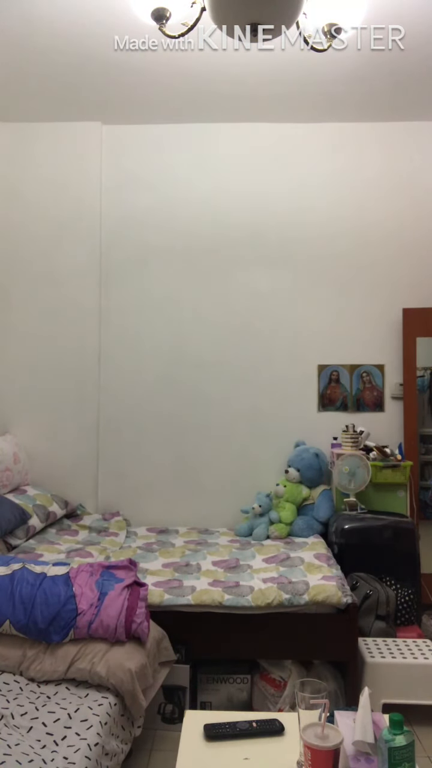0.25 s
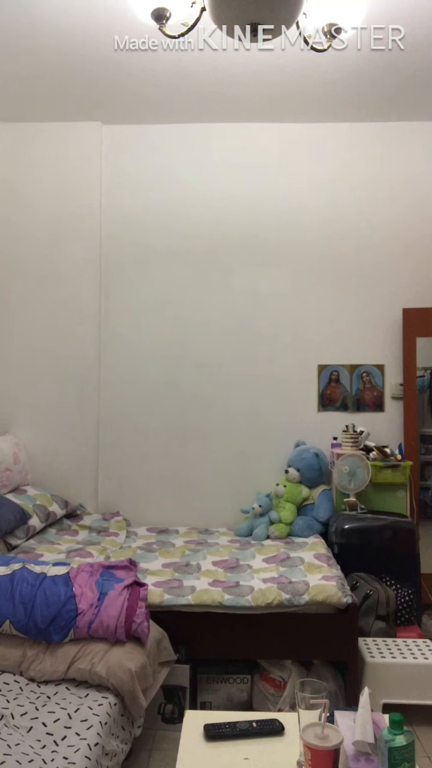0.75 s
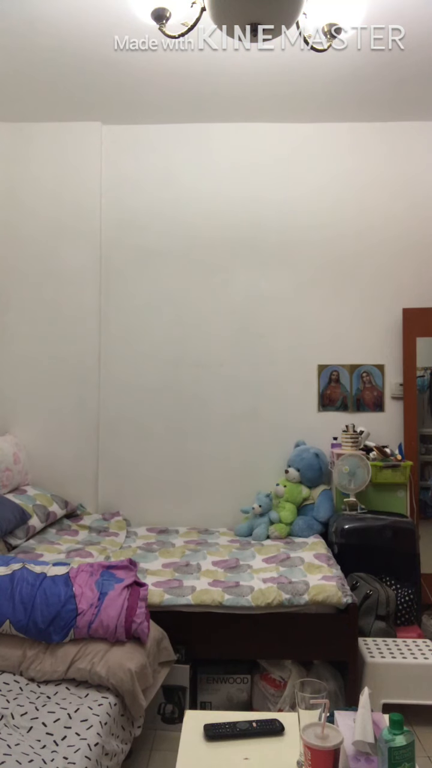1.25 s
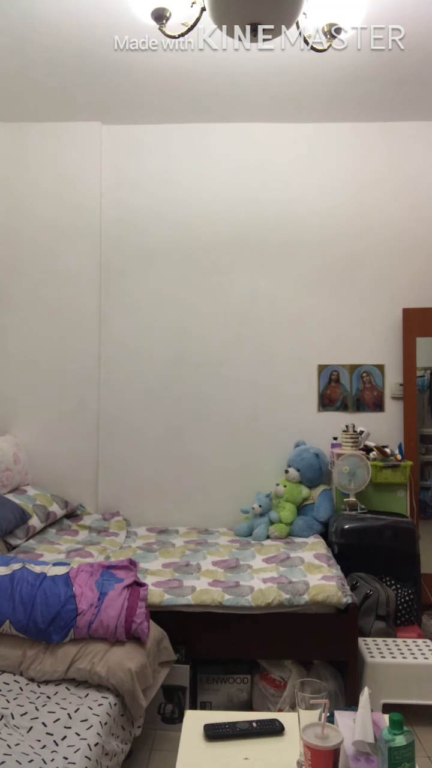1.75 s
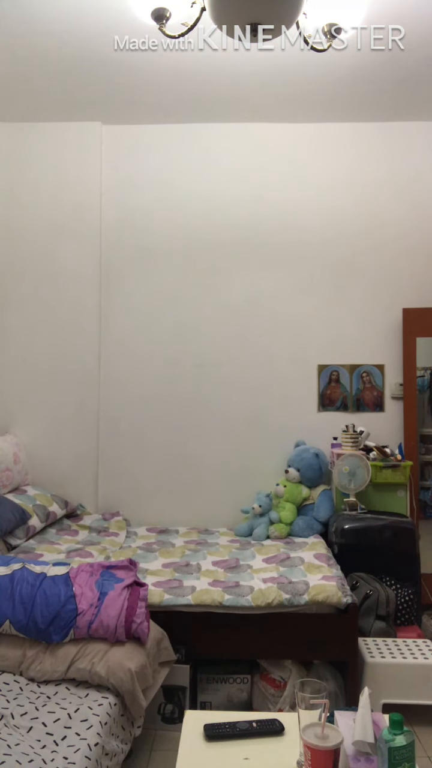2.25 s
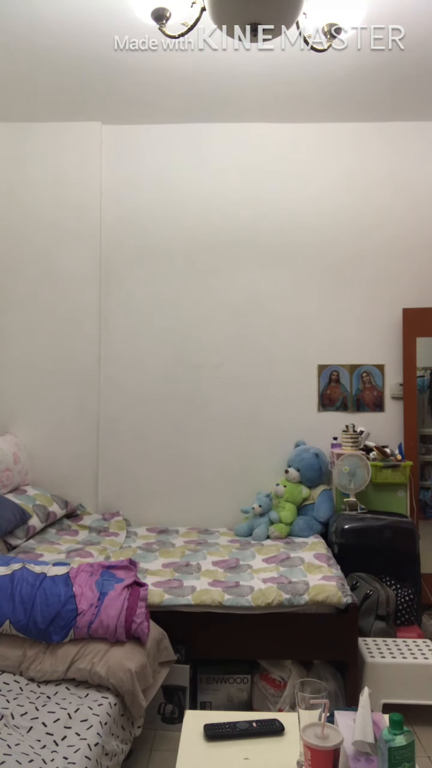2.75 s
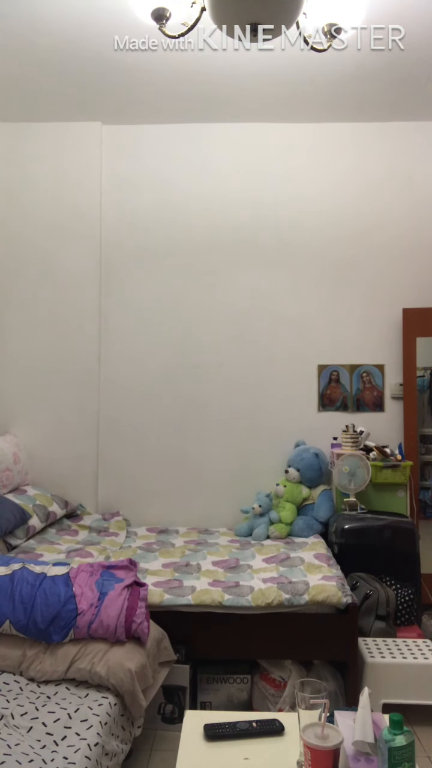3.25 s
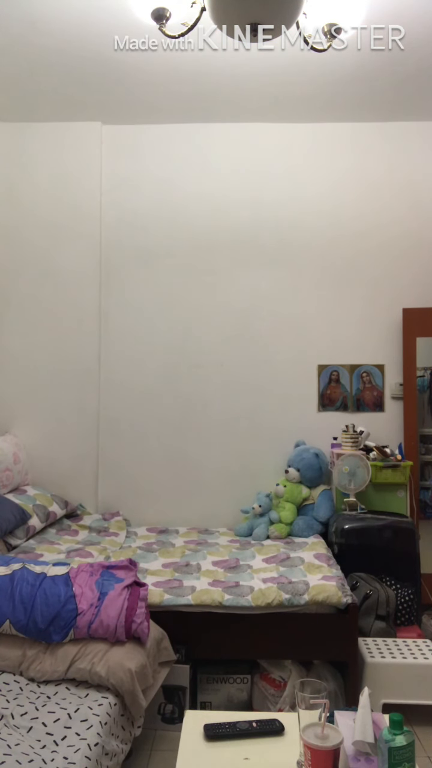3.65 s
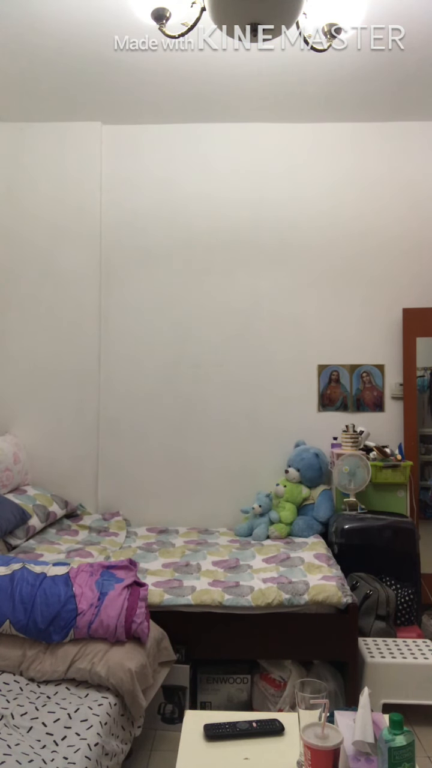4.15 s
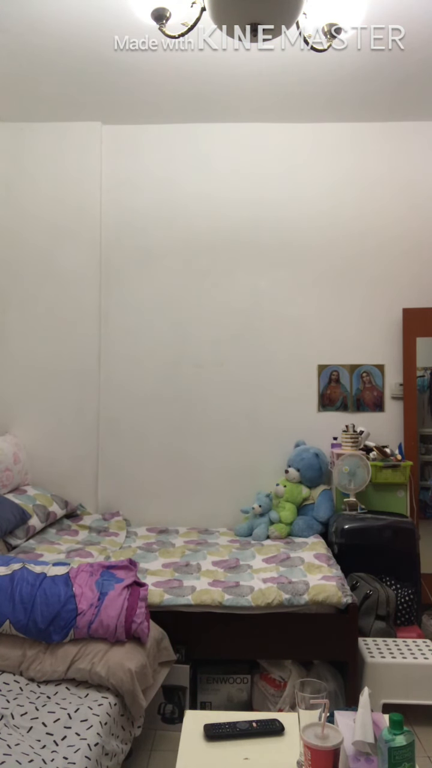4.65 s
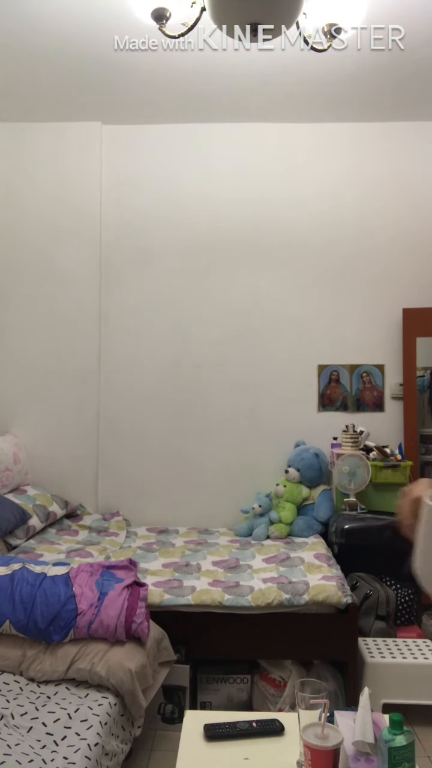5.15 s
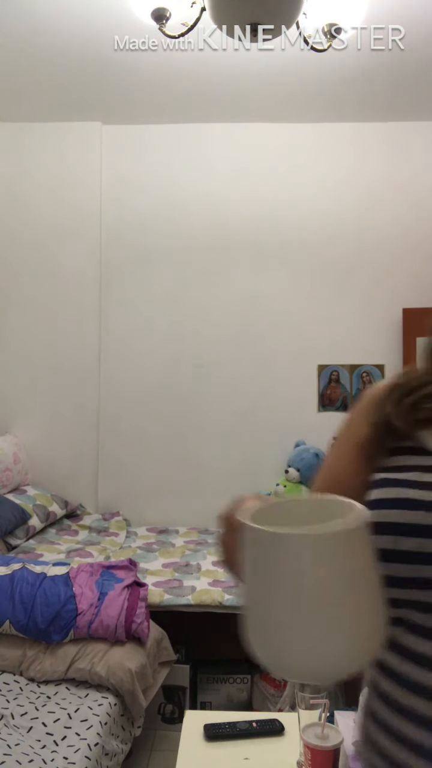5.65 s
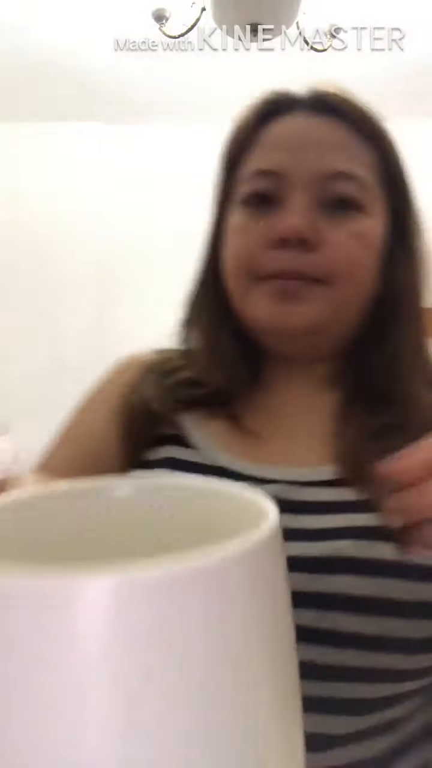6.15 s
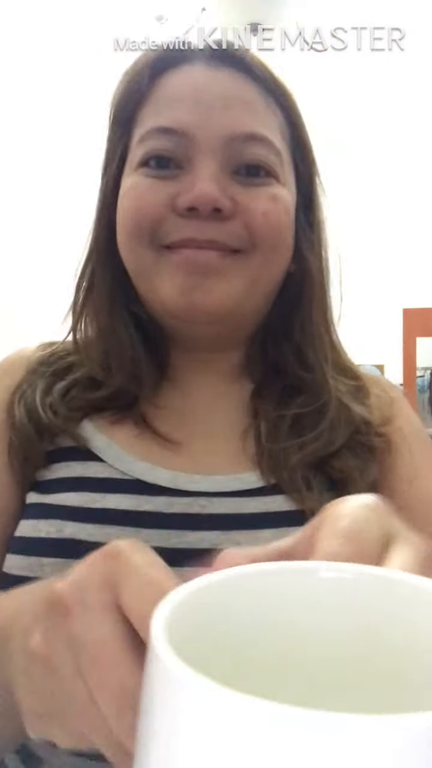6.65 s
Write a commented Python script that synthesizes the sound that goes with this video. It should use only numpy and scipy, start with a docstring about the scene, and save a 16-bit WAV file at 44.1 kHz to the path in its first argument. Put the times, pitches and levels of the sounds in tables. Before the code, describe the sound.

A low, steady fan drone and soft air noise run throughout a small bedroom with a short echo, heard from a phone on a wooden table. At about 0.3 seconds four hard, woody knocks tumble together within a tenth of a second, and loose things buzz briefly. The fan sinks slightly. Faint scrapes and tiny metallic ticks appear from 1.6 to 2.9, then a metal spoon clatters sharply at 3.0 to 3.15, bright and chattering, trailing into weak taps on a ceramic mug near 3.3. Very soft hiss swells from 4.0, with a clear double mug clink at 4.27. Hard bumps return at 5.05 and around 5.4, rattling longer, with a lighter knock at 6.25. At 6.46 the mug lands nearby with a dry wooden thud and rocks unevenly, bumping and ticking until 6.7, with fainter touches to 6.9.

```python
"""A drink is made in a small bedroom, heard from a phone on a wooden table while a fan hums throughout.
First things are bumped and rattle; after some faint scrapes a metal spoon clatters and clinks on a mug.
The mug clinks again over soft hiss, more things are bumped, and at the end the mug rocks to rest nearby.
Hard things are sums of fading tones started by short blows; scrapes, hiss and the fan are filtered noise.
A fading burst of noise stands in for the echoes of the room."""
import sys
import numpy as np
from scipy import signal
from scipy.fft import rfft, irfft
from scipy.io import wavfile

SR = 44100
rng = np.random.default_rng(int(sys.argv[2]) if len(sys.argv) > 2 else 0)


def master_out(mix):
    """Clip the mix to full scale and print it as 16-bit PCM to the path in sys.argv[1]."""
    frames = np.transpose(np.atleast_2d(mix))
    ceiling = np.clip(frames, -1, 1)
    pcm = np.round(ceiling * 32767).astype(np.int16)
    wavfile.write(sys.argv[1], SR, pcm)


N = 304290  # length of the scene in samples
T = np.arange(N) / SR  # the whole scene, in seconds
RING = T[:SR]  # one second, long enough for any single blow


# The spoon's strikes. Each row: start in seconds, relative level in dB, length of the chatter in seconds,
# tilt towards the treble in dB per octave.
SPOON_STRIKES = [(2.198, -44.5, .011, 15), (2.423, -27, .026, -3), (2.823, -37.5, .039, -9),
                 (3.02, -13, .01, -2), (3.034, -7, .016, 2), (3.049, -8.5, .012, 9),
                 (3.126, -10, .039, -0.5), (3.279, -32, .009, -6), (3.374, -28.5, .024, -3)]
# The tones of the spoon. Each row: pitch in Hz, width in Hz (wider fades faster), relative level in dB.
SPOON_TONES = [(706, 33, -17.5), (2186, 85, -6), (2850, 130, -15), (4343, 92, -1.5), (4880, 23, -31),
               (5310, 57, 2), (6850, 64, -3), (7270, 120, -1), (7520, 45, -8), (7700, 25, -19),
               (8470, 36, -13.5), (9174, 41, 2.5), (11060, 27, -19.5), (11200, 47, -5), (12400, 69, -30),
               (12850, 27, -6), (13400, 39, 3), (14100, 30, -7.5), (14600, 45, -23), (16000, 52, -9)]
# After every strike the spoon springs back and lands again, more softly: delay in seconds, change in dB.
REBOUND_S, REBOUND_DB = 0.036, -7.5


def spoon(crack_db=-14, direct_db=-13, room_db=0):
    """The spoon chatters and rebounds; each contact cracks and rings the tones of its bending metal."""
    out = np.zeros(N)
    for start, db, length, tilt_db in SPOON_STRIKES:
        crack = unit(band(burst(0.026), 9000, 1.7))
        blow = chime(SPOON_TONES, tilt_db) + undb(crack_db) * crack
        for lag, change_db in (0, 0), (REBOUND_S, REBOUND_DB):
            strike = unit(through(chatter(length, count=7), blow))
            add(out, start + lag, undb(db + change_db) * strike)
    return undb(direct_db) * out + undb(room_db) * room(out)


# Blows on the mug wall. Each row: start in seconds, relative level in dB, contact brightness in Hz
# (treble above it is softened).
MUG_BLOWS = [(3.281, -25.5, 3620), (3.301, -24, 2850), (4.2647, -21, 17000), (4.269, -13, 16900)]
# The tones of the mug. Each row: pitch in Hz, width in Hz (wider fades faster), relative level in dB.
MUG_TONES = [(2410, 34, -1), (2555, 42, 1), (4040, 45, -7), (4220, 90, -6), (6240, 60, -2), (7420, 55, -4),
             (7960, 70, -2), (2880, 80, -22), (3370, 40, -18), (5080, 100, -16), (6940, 35, -18),
             (10200, 110, -13), (10700, 150, -17), (11730, 70, -12), (12050, 65, -6), (13400, 120, -15),
             (14000, 90, -14), (14400, 80, -15)]


def mug(direct_db=-10, room_db=0):
    """The mug wall rings at many pitches, some of them close pairs because the handle splits them."""
    out = np.zeros(N)
    for start, db, brightness in MUG_BLOWS:
        clink = unit(soften(chime(MUG_TONES), brightness, order=4))
        add(out, start, undb(db) * clink)
    return undb(direct_db) * out + undb(room_db) * room(out)


# The mug's foot meeting the table. Each row: start in seconds, bump level in dB, contact brightness in Hz,
# level of the glaze tick in dB, tilt of the tick towards the treble in dB per octave.
FOOT_CONTACTS = [(6.4632, -3.5, 940, -32.5, -1), (6.474, -20, 400, -41, 6), (6.5078, -9.5, 496, -60, -13),
                 (6.515, -13.5, 2500, -19, 1.5), (6.536, -33, 500, -38.5, -19), (6.61, -10.5, 820, -27, -7),
                 (6.64, -15, 400, -32, -8), (6.674, -28.5, 400, -29, 2), (6.815, -22, 1130, -42.5, 3),
                 (6.842, -28, 1200, -41.5, -2), (6.886, -25, 1520, -38.5, 3)]
# The tones of the table top. Each row: pitch in Hz, relative level in dB, seconds to fade by 60 dB.
TABLE_TONES = [(134, -4, 0.038), (245.5, 7, 0.014), (290, 4, 0.065), (469, -12, 0.11), (712, -4, 0.014),
               (973, -5, 0.03), (1490, -6, 0.0093), (2110, -10.5, 0.045)]
# The tones of the skidding glaze. Each row: pitch in Hz, width in Hz (wider fades faster),
# relative level in dB.
GLAZE_TONES = [(1510, 1000, 12.5), (2200, 110, 10), (3200, 360, 9), (3980, 360, 10), (6100, 43, 14.5),
               (7940, 390, -33), (10970, 150, 11), (13900, 520, -22)]


def set_down(skid_s=0.0046, room_db=-19, glaze_room_db=-7):
    """The mug rocks on the table: each contact is a dry wooden bump and a tick where the glaze skids."""
    bumps, ticks = np.zeros(N), np.zeros(N)
    for start, db, brightness, tick_db, tilt_db in FOOT_CONTACTS:
        bump = unit(soften(ring(TABLE_TONES, scatter_db=2.5), brightness))
        add(bumps, start, undb(db) * bump)
        glaze = soften(chime(GLAZE_TONES, tilt_db), 6800)
        tick = unit(through(chatter(skid_s, count=6), glaze))
        add(ticks, start, undb(tick_db) * tick)
    return bumps + ticks + room(undb(room_db) * bumps + undb(glaze_room_db) * ticks)


# Things bumped on furniture. Each row: start in seconds, thud level in dB, pitch of the edge clack in Hz,
# level of the edge clack in dB, cycles the edge clack takes to fade by 60 dB,
# level of the landing clack in dB, level of the room echo relative to the blow in dB.
BUMPS = [(0.272, -16.5, 335, -23, 9.8, -12.5, -2), (0.316, -8, 615, -8.5, 3, -5.5, -5.5),
         (0.347, -6.5, 880, -17, 15, -14, -1), (0.3733, -6, 1036, -14, 3, -2, -12),
         (3.279, -35, 890, -44, 6.8, -50, 4.5), (4.79, -40, 2430, -47, 7.3, -65, 6),
         (5.046, -9, 1640, -10.5, 12, -21, 2.5), (5.343, -16, 467, -19.5, 22, -43, -3.5),
         (5.392, -6, 1130, -5, 4.1, -6.5, -8), (5.454, -26, 267, -40, 7, -13, -5),
         (5.753, -52.5, 1640, -35, 2.1, -56, 3.5), (6.2551, -16, 1160, -23, 2.6, -30, 2)]
# The tones of the furniture. Each row: pitch in Hz, relative level in dB, seconds to fade by 60 dB.
FURNITURE_TONES = [(86.7, -19, 0.32), (125.3, 0, 0.04), (147.6, -4, 0.24), (237.6, 5, 0.021),
                   (319.5, 0, 0.023), (356.5, -1.5, 0.053), (475, -7, 0.022), (716, -11.5, 0.029),
                   (1236, -38, 0.18)]
# The full weight lands a moment after the edge (seconds), with a deeper clack (times the edge pitch)
# that fades by 60 dB within a few cycles. The edge thuds more softly than the landing (dB).
LANDING_S, LANDING_PITCH, LANDING_CYCLES, EDGE_THUD_DB = .006, 0.43, 7.1, -5


def knocks():
    """Each bump clacks on an edge, then lands with its full weight; both thud in the furniture."""
    near, far = np.zeros(N), np.zeros(N)
    for start, thud_db, hz, edge_db, cycles, landing_db, room_db in BUMPS:
        edge_thud = undb(thud_db + EDGE_THUD_DB) * ring(FURNITURE_TONES, scatter_db=4.5)
        edge = edge_thud + undb(edge_db) * clack(hz, cycles)
        landing_thud = undb(thud_db) * ring(FURNITURE_TONES, scatter_db=2.5)
        landing = landing_thud + undb(landing_db) * clack(hz * LANDING_PITCH, LANDING_CYCLES)
        for lag, blow in (0, edge), (LANDING_S, landing):
            add(near, start + lag, blow)
            add(far, start + lag, undb(room_db) * blow)
    return near + room(far)


def clack(hz, cycles, crack_db=-7, crack_reach=1.65):
    """A hard contact: one quickly fading tone and a dull crack."""
    tone = ring([(hz, 0, cycles / hz)])
    crack = unit(soften(burst(0.062), hz * crack_reach))
    return unit(soften(tone + undb(crack_db) * crack, 3 * hz))


# Loose things set shaking. Each row: start in seconds, relative level in dB, change per swing in dB,
# level of the metallic ring relative to the buzz in dB.
SHAKES = [(0.318, -25.5, -32, -21), (0.386, -18, -16.5, -10), (5.044, -19, -23, -11.5),
          (5.26, -32.5, -13, -14), (5.413, -23.5, -6.5, -8.5), (6.255, -32.5, -6.5, -15)]
# The tones of the rattling metal. Each row: pitch in Hz, width in Hz (wider fades faster),
# relative level in dB.
METAL_TONES = [(6810, 140, -6), (6940, 230, -1), (9430, 72, -7), (11950, 400, -19)]
# One buzz per swing: seconds between swings, seconds of buzz.
# The metallic ring stands out more on each swing, by this many dB.
SWING_S, BUZZ_S, METAL_DB_PER_SWING = .088, .042, 1


def rattles(direct_db=-10, count=4):
    """Loose things buzz after a knock, weaker on every swing, with a thin metallic ring."""
    out, metal = np.zeros(N), chime(METAL_TONES)
    for start, db, fall_db, ring_db in SHAKES:
        for swing in range(count):
            contacts = chatter(BUZZ_S, count=24)
            buzz = unit(soften(band(band(contacts, 2230, 2.8), 2340, 1.3), 11400))
            metal_db = ring_db + swing * METAL_DB_PER_SWING
            ringing = undb(metal_db) * unit(through(contacts, metal))
            add(out, start + swing * SWING_S, undb(db + swing * fall_db) * (buzz + ringing))
    return undb(direct_db) * out + room(out)


# Scraping, handling, swells of background hiss and the low body noise under the spoon's clatter.
# Each row: start in seconds, length in seconds, relative level in dB, middle of the noise band in Hz.
NOISE_SWELLS = [(1.613, .18, -54.5, 3200), (1.941, 0.06, -40.5, 6000), (2.02, 0.039, -45, 6470),
                (2.419, 0.047, -34, 8000), (2.549, 0.58, -52.5, 5900), (2.819, 0.038, -39.5, 7000),
                (2.889, 0.072, -42.5, 5500), (3.017, 0.085, -41, 790), (3.99, 1.26, -58, 4200),
                (4.792, 0.047, -45.5, 4300), (5.852, 0.62, -57, 12200), (5.873, 0.24, -55.5, 4760),
                (6.519, 0.33, -53, 5130)]


def noise_swells(grain_db=3, direct_db=-6):
    """Scrapes, hiss and body noise: a dense stream of uneven grains that swells and stops."""
    out = np.zeros(N)
    for start, length, db, hz in NOISE_SWELLS:
        n = int(length * SR)
        unevenness = undb(grain_db * rng.exponential(size=2 * SR))
        grains = band(rng.standard_normal(2 * SR) * unevenness, hz, 1.41)[:n]
        swell = signal.windows.tukey(n, .5)
        add(out, start, undb(db) * grains / grains.std() * swell)
    return undb(direct_db) * out + room(out)


# The colour of the fan's noise. Each row: pitch in Hz, relative level in dB per Hz.
FAN_SPECTRUM = [(15, -17), (25, 10), (49, -1.5), (66, -9.5), (102, 2.5), (249, -14), (285, -2.5),
                (317, -14), (416, -15), (463, -17.5), (607, -20), (1890, -27.5), (2050, -27.5),
                (6380, -36.5), (16000, -48)]
# How loud the phone lets the background noise through over time, written out by hand: it is turned down
# after loud knocks and recovers. Each row: time in seconds, relative level in dB.
BACKGROUND_LEVEL = [(0.0, -36), (0.31, -33.5), (0.77, -43), (3.59, -38), (4.67, -38), (5.36, -32.5),
                    (5.84, -42), (6.21, -39.5), (6.47, -38), (6.9, -32)]
BACKGROUND_DB = 2.5  # added to every background level


def fan():
    """Steady moving air: noise droning at a few low resonances, let through at a set level over time."""
    hz, db = np.transpose(FAN_SPECTRUM)
    f = np.maximum(np.fft.rfftfreq(N, 1 / SR), 1)
    colour = undb(np.interp(np.log(f), np.log(hz), db))
    air = irfft(rfft(rng.standard_normal(N)) * colour, N)
    level_db = BACKGROUND_DB + np.interp(T, *np.transpose(BACKGROUND_LEVEL))
    return air / air.std() * undb(level_db)


# How long the room echoes. Each row: pitch in Hz, seconds to fade by 60 dB.
ROOM_FADE = [(100, 0.41), (300, 0.36), (1000, 0.28), (2500, 0.36), (7000, 0.37), (14000, 0.17)]


def room(x, build_s=0.0014, gap_s=0.0018):
    """Blurred echoes that start after a tiny gap, build up quickly and die away band by band."""
    noise, tail = rfft(rng.standard_normal(SR)), 0
    octave = np.log2(np.maximum(np.arange(len(noise)), 1))
    hz, t60s = np.transpose(ROOM_FADE)
    # each band takes its share of the noise, crossing smoothly into its neighbours
    for share, t60 in zip(np.eye(len(hz)), t60s):
        weight = np.interp(octave, np.log2(hz), share)
        tail = tail + irfft(noise * weight, SR) * fade(t60)
    tail = tail * (1 - np.exp(-np.maximum(RING - gap_s, 0) / build_s))
    return through(x, tail / np.sqrt(np.sum(tail ** 2)))


def chime(peaks, tilt_db=0):
    """Bright tones started together by one blow; the point of contact tilts their balance."""
    total = 0
    for hz, width, db in peaks:
        strength = undb(db + tilt_db * np.log2(hz)) * width
        total = total + strength * np.exp(-np.pi * width * RING) * np.cos(2 * np.pi * hz * RING)
    return unit(total)


def ring(modes, scatter_db=0):
    """Fading tones; each point of contact weights them a little differently."""
    total = 0
    for k, (hz, db, t60) in enumerate(modes):
        # every second tone starts upside down
        tone = unit(np.sin(2 * np.pi * hz * RING + k * np.pi) * fade(t60))
        total = total + undb(db + scatter_db * rng.standard_normal()) * tone
    return unit(total)


def chatter(length, count):
    """A first contact and a string of uneven bounces that tend to weaken."""
    x = np.zeros(SR)
    bounce = np.arange(count)
    jitter = rng.random(count) * (bounce > 0)  # the first contact is exactly on time
    when = (bounce + jitter) / count  # as a fraction of the length
    x[(when * length * SR).astype(int)] = np.exp(-when) * undb(1 * rng.standard_normal(count))
    return x


def burst(t60):
    """A short crack of noise."""
    return unit(rng.standard_normal(SR) * fade(t60))


def fade(t60):
    """Smooth dying away, by 60 dB in t60 seconds."""
    return np.exp(-np.log(1000) * RING / t60)


def soften(x, hz, order=2):
    """A longer contact passes less treble."""
    sos = signal.butter(order, min(hz, SR / 2 - 1000), fs=SR, output="sos")
    return signal.sosfilt(sos, x)


def band(x, hz, spread):
    """Broad resonance from hz / spread to hz * spread."""
    spread = max(spread, 1.05)
    edges = [hz / spread, min(hz * spread, SR / 2 - 1000)]
    return signal.sosfilt(signal.butter(1, edges, "band", fs=SR, output="sos"), x)


def through(x, response):
    """Let x set a response ringing."""
    return signal.fftconvolve(x, response)[:len(x)]


def unit(x):
    """Scale a blow to the energy of 10 ms at full level."""
    return x * np.sqrt(SR / 100 / np.sum(x ** 2))


def undb(db):
    """Turn decibels into a plain multiplier."""
    return 10 ** (np.asarray(db) / 20)


def add(out, start, x):
    """Mix x into out from a start time in seconds."""
    i = max(int(start * SR), 0)
    out[i:i + len(x)] += x[:max(N - i, 0)]


def scene():
    """Everything as it reaches the phone, with the background level already set."""
    return (spoon() + mug() + set_down() + knocks() + rattles() + noise_swells() + fan())[None]


TOP_HZ = 15800  # the phone passes almost nothing above this


def record(dry):
    """The phone drops the deepest bass, clips the hardest knocks and cuts the top."""
    x = signal.sosfilt(signal.butter(6, 39, "high", fs=SR, output="sos"), dry)
    x = np.clip(x, -1, 1)
    return signal.sosfilt(signal.ellip(10, .2, 80, TOP_HZ, fs=SR, output="sos"), x)


dry = scene()
out = record(dry)
master_out(out)
```